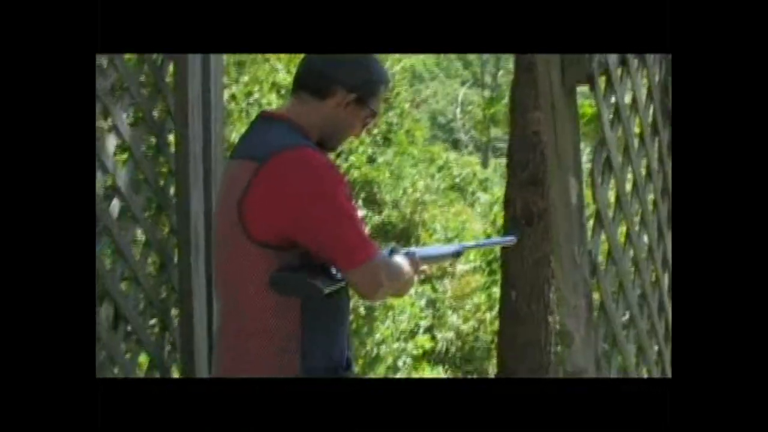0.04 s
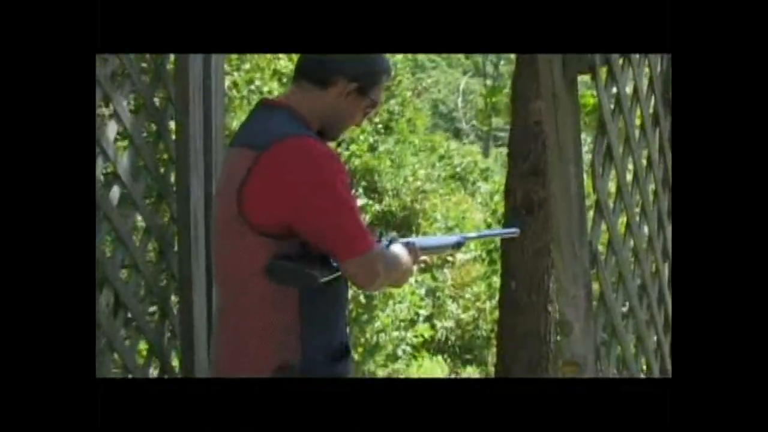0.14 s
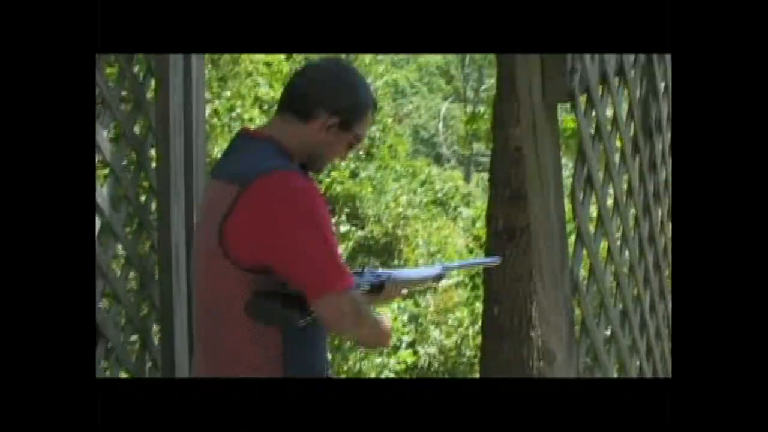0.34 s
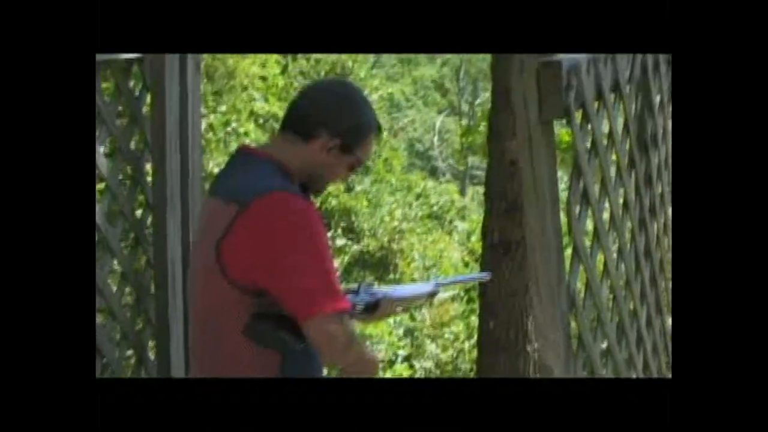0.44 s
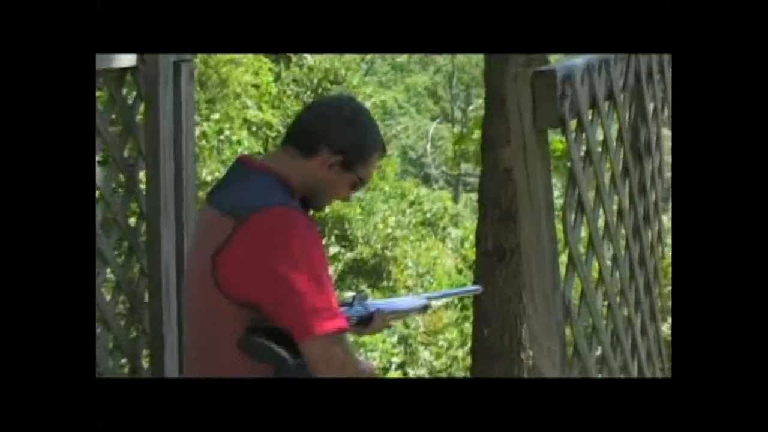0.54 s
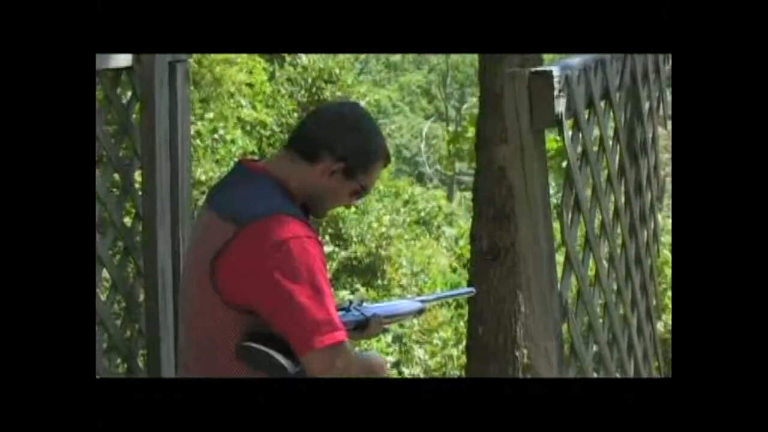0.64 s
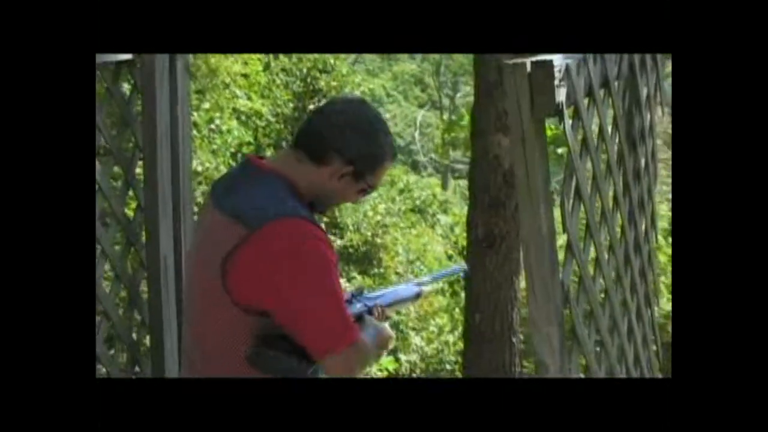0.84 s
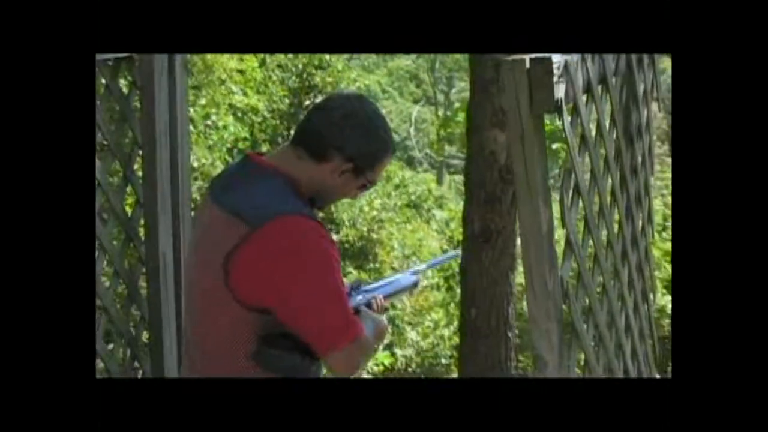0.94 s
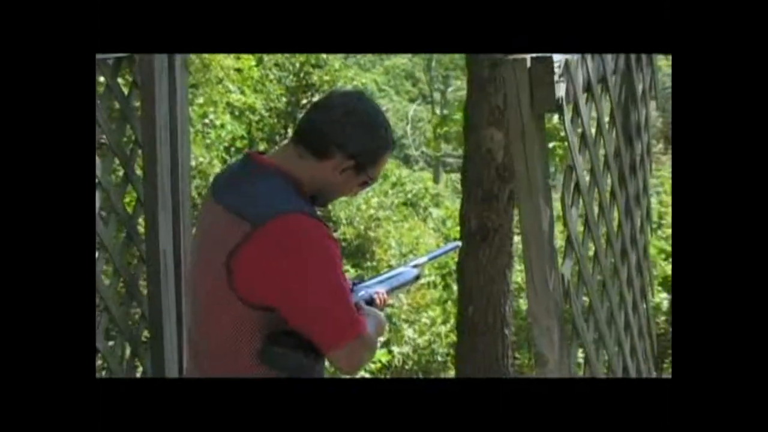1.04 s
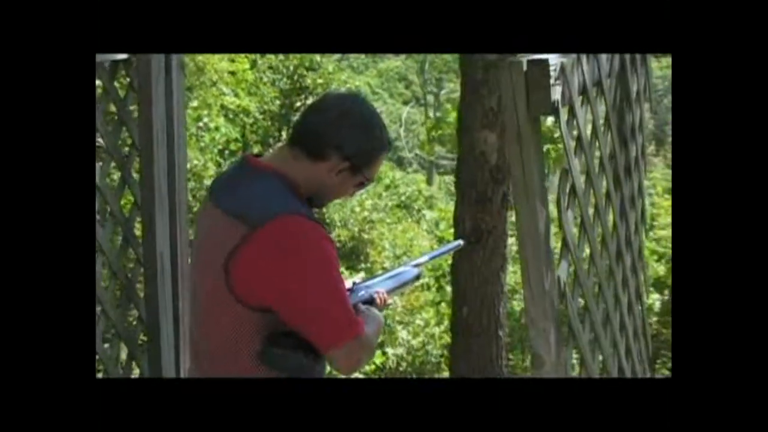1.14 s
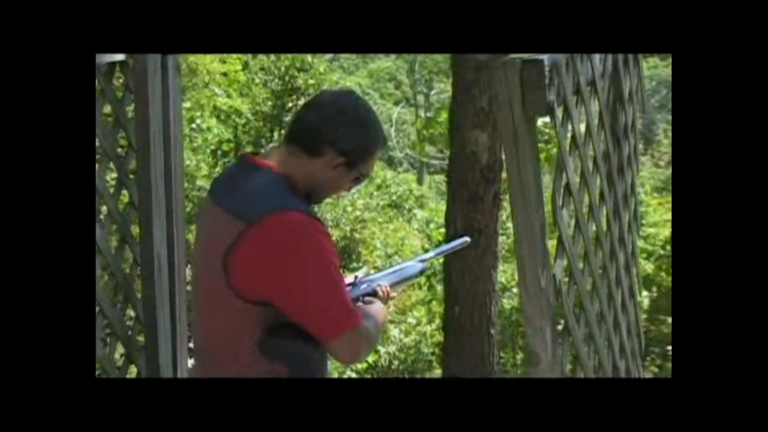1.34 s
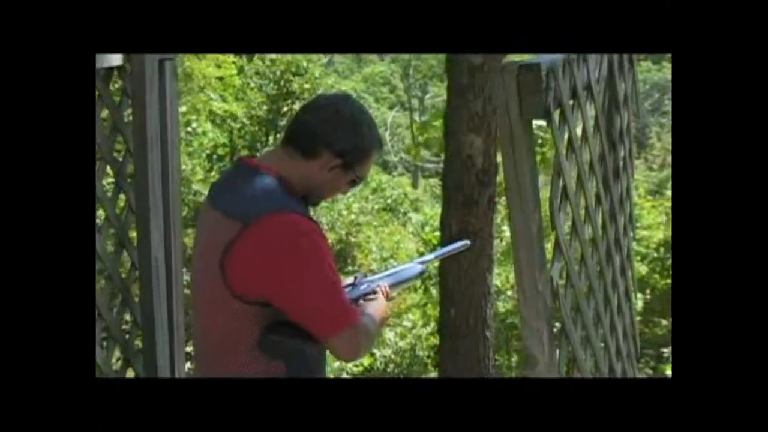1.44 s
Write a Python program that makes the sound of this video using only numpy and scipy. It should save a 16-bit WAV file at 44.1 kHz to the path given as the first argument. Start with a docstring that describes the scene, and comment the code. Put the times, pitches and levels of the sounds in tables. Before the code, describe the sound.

A shotgun bolt scrapes forward and slams shut with a loud clack and brief steel ring. Hands softly bump the gun, then a shell clicks against the loading gate. Light wind lies underneath at an outdoor wooden shooting stand.

```python
"""Soft bumps of hands and a faint click, then a shotgun's bolt scrapes forward and slams shut: a fast run
of metal contacts that overloads the microphone and leaves the steel ringing. Hands bump the gun again
and a shell clicks against the loading gate. The open wooden shooting stand throws back quick reflections,
fence and trees add a faint tail, and light wind and distant outdoor noise lie underneath."""
import sys
import numpy as np
from scipy import signal
from scipy.fft import rfft, irfft
from scipy.io import wavfile
from scipy.ndimage import uniform_filter1d

SR = 44100
rng = np.random.default_rng(int(sys.argv[2]) if len(sys.argv) > 2 else 0)


def store_pcm(level_fs):
    """Save levels as 16-bit WAV."""
    pcm = np.round(np.clip(level_fs, -1, 1) * 32767).astype(np.int16)
    wavfile.write(sys.argv[1], SR, np.atleast_2d(pcm).T)


N = 63945

# Hits of the closing bolt: start_s, body_db, clank_db, treble_db, hold_s, ring_hz, boost_db
BOLT_HITS = [(0.2403, -31, -19.5, -29, .0015, 2965, 15), (0.2436, -18, -24, -22, .0017, 6760, 7.5),
             (0.2499, -18.5, -17.5, -26, 0.001, 1988, 1), (0.2526, -14.5, -10, -14, 0.0012, 476, 9.5),
             (0.2577, -24.5, -16, -18.5, 0.0076, 1240, 14), (0.2648, -18.5, -20, -18.5, 0.0015, 6100, 12),
             (0.2685, -16, -21.5, -20, .003, 799, 0), (0.2728, -20, -14, -19, 0.0019, 7040, 9.5),
             (0.2785, -25, -15.5, -20.5, 0.002, 2388, 4.5), (0.2814, -8.5, -9.5, -11, 0.0049, 700, 5),
             (0.2865, -18, -19.5, -28.5, 0.0037, 2320, -10), (0.2950, -21, -22, -24.5, 0.0079, 2000, 1.5),
             (0.3025, -10, -13, -13.5, .0035, 535, 8.5), (0.3072, -25.5, -21, -20.5, .003, 1460, 4.5),
             (0.3123, -17, -8.5, -10, .005, 15100, 9.5), (0.3176, -3, -3.5, -4.5, 0.0046, 2150, 3),
             (0.3229, -7.5, -9, -11, .0048, 1400, 0.5)]
# Short resonances of the bolt and its rails: pitch_hz, width_hz, level_db
BOLT_MODES = [(461.5, 160, -6.5), (700, 90, 1), (781, 23, 1.5), (950, 160, 2.5), (1415, 210, -5),
              (1487, 45, -2.5), (1663, 70, -1), (1990, 200, -1.5), (2250, 180, 0.5), (2565, 50, -3),
              (2850, 250, -3), (3185, 230, -5.5), (4513, 200, -12.5), (5530, 300, -11), (5940, 830, -12),
              (7280, 470, -8), (8330, 460, -7.5), (8800, 1500, -12.5), (12420, 1400, -8.5),
              (13940, 350, -17.5)]
# Broad tone of the bolt hits: frequency_hz, gain_db
BOLT_EQ = [(40, 2.5), (150, 1), (330, 0), (500, -2), (850, -4), (1150, -0.5), (2200, -4.5), (3000, -3.5),
           (4000, 0.5), (6000, -2), (8300, -2), (10500, 0.5), (12500, -5.5), (15300, -1.5)]
# Long ring of barrel and spring: pitch_hz, relative_db, t60_s
STEEL_MODES = [(495, -33, .27), (1335, -32, .17), (1663, -32, .56), (2557, -49, .24), (4463, -48, .35),
               (5060, -58, .5), (6315, -54, .27), (6745, -50, .2), (9087, -52, .23), (9412, -46, .18),
               (11538, -52, .22)]
# Clicks of shell, gate and fingers: start_s, body_db, clank_db, treble_db, hold_s, ring_hz, boost_db
SHELL_CLICKS = [(0.0390, -41.5, -51, -66, 0.0018, 1140, 24), (0.9720, -65, -75, -58, 0.0022, 12500, 20.5),
                (1.0592, -28.5, -49, -54, 0.00045, 500, 17.5), (1.0718, -44, -72, -44, 0.0014, 988, 19.5),
                (1.0782, -30.5, -39.5, -83, 0.0023, 1100, 3), (1.1250, -47, -47.5, -61, 0.0017, 1060, 17),
                (1.2184, -22.5, -21.5, -21.5, 0.0021, 1474, 3.5), (1.2218, -29, -50, -29, 0.0019, 6530, 2),
                (1.2480, -37, -48, -60, 0.00049, 3060, -1), (1.2612, -38.5, -38.5, -47, 0.0024, 3150, 3.5),
                (1.2662, -30.5, -44, -37.5, 0.00175, 7630, 12.5), (1.2688, -32, -37, -38, 0.0023, 1570, 7),
                (1.2912, -40, -50.5, -48, 0.00066, 3300, 14), (1.3788, -36, -31, -37, 0.00029, 3170, -4),
                (1.4010, -52, -33, -45, 0.0004, 2500, 3.5), (1.4470, -66, -33.5, -43, 0.00036, 4250, 6.5)]
# Short resonances of the receiver: pitch_hz, width_hz, level_db
RECEIVER_MODES = [(745, 90, -3), (855, 85, 8), (1340, 170, 2), (1570, 170, 0), (1900, 220, -2),
                  (2450, 260, -1), (3100, 240, 2), (4580, 300, -7), (4930, 250, -7), (5860, 350, -7),
                  (6730, 230, -4), (8200, 400, -10), (9800, 800, -7), (11650, 400, -8)]
# Broad tone of the clicks: frequency_hz, gain_db
CLICK_EQ = [(60, -20), (250, 0), (420, -8.5), (650, 0), (1100, -8.5), (1500, -4), (3000, -2), (3700, -2),
            (4500, -2), (6000, -6), (11000, -9.5), (15500, -2)]
# Soft bumps of hands and stock: start_s, level_db, pitch_hz, length_s, relative_rub_db
HAND_BUMPS = [(0.037, -35, 74, 0.014, -14), (0.131, -38.5, 58, 0.015, -18), (0.146, -36, 93, 0.014, -29),
              (0.241, -29, 59, 0.0079, -17), (0.310, -24.5, 74.7, 0.013, -7),
              (0.616, -39.5, 117, 0.017, -18), (0.658, -38, 114.7, .016, -14.5),
              (0.707, -32, 158.3, 0.02, -6), (0.732, -36, 149.7, 0.02, -7.5), (0.923, -35, 183, 0.015, -9),
              (1.058, -38, 385, 0.0056, -13), (1.266, -39, 279, 0.012, -10)]
# Reverb tail from fence and trees: frequency_hz, t60_s, level_db
YARD_SCATTER = [(200, 0.35, -26.5), (600, 0.13, -19), (1566, 0.18, -31), (3940, .4, -25), (9500, 0.22, -21),
                (15380, 0.34, -23)]
# Tone of the outdoor bed: frequency_hz, gain_db
AIR_EQ = [(20, -29), (45, -5.5), (80, 0), (130, -3.5), (200, -8.5), (400, -13.5), (800, -13.5),
          (1300, -18.5), (2000, -25.5), (4000, -31), (8000, -38), (12000, -40), (15500, -49.5)]
# Fader moves of the wind rumble: time_s, level_db
RUMBLE_FADER = [(0, -45), (.15, -50.5), (.21, -48), (.4, -47.5), (0.661, -45.5), (0.801, -47.5),
                (.86, -46.5), (.9, -57.5), (.96, -49.5), (1.1, -55), (1.19, -52.5), (1.3, -56), (1.45, -55)]

BODY_HZ, CLANK_LOW_HZ, CLANK_HIGH_HZ, TREBLE_HZ = 1083, 2270, 4200, 7000  # a contact's three bands
RING_Q, BEND_DELAY_S = 6.4, 0.00069
CRACK_DB, CRACK_S, GRAIN_DB = -4, 0.00069, 5.5
LOCK_S, STEEL_TRIM_DB = 0.35, -5.5
RUB_BAND_HZ = (111, 444)
STAND_DB, STAND_T60_S = -14.5, 0.04
WASH_DB, RUMBLE_BELOW_HZ = -52, 250
DRIVE_DB, CEILING, LOWPASS_HZ = 0.5, 0.92, 15500


def bolt():
    """The bolt clatters along its rails and slams shut."""
    return metal_contacts(BOLT_HITS, BOLT_MODES, BOLT_EQ, release_s=0.0015)


def steel_ring():
    """Barrel and spring ring on after the bolt locks."""
    t, out = np.arange(N) / SR, np.zeros(N)
    for hz, db, t60 in STEEL_MODES:
        decay = np.exp(-np.log(1000) * t / t60)
        add(out, LOCK_S, amp(STEEL_TRIM_DB + db) * decay * np.sin(2 * np.pi * hz * t))
    return out


def shell_clicks():
    """Shell, gate and fingers tap the receiver: small, tight clicks."""
    return metal_contacts(SHELL_CLICKS, RECEIVER_MODES, CLICK_EQ, release_s=0.00052)


def metal_contacts(hits, modes, eq, release_s, size=4096):
    """Each contact rings the metal and favours one pitch region, set by where it lands."""
    hz, out = np.fft.rfftfreq(size, 1 / SR), np.zeros(N)
    mode_power = sum(amp(db) ** 2 / (1 + (2 * (hz - f) / width) ** 2) for f, width, db in modes)
    metal = unit(np.sqrt(mode_power) * amp(curve(eq, hz)))
    bend_delay = BEND_DELAY_S / np.sqrt(1 + (hz / BODY_HZ) ** 2)  # low bending waves arrive late
    bend_phase = 2 * np.pi * np.cumsum(bend_delay) * SR / size
    for start_s, body_db, clank_db, treble_db, hold_s, ring_hz, boost_db in hits:
        bands = [(BODY_HZ, body_db), (CLANK_LOW_HZ, clank_db),
                 (CLANK_HIGH_HZ, clank_db), (TREBLE_HZ, treble_db)]
        ring = 1 + (amp(boost_db) - 1) / (1 + (2 * RING_Q * (hz / ring_hz - 1)) ** 2)
        log_gain = np.log(metal * ring * amp(curve(bands, hz)))
        # Minimum phase keeps the attack sharp, with the ring behind it.
        phase = signal.hilbert(np.r_[log_gain, np.flip(log_gain[1:-1])]).imag[:len(hz)]
        response = np.exp(log_gain - 1j * (phase + bend_phase))
        add(out, start_s, irfft(chatter(hold_s, release_s, size) * response))
    return out


def chatter(hold_s, release_s, size):
    """Near-flat spectrum of a burst of uneven micro-impacts: a crack, a hold, then a die-away."""
    t = np.arange(size) / SR
    crack = 1 + amp(CRACK_DB) * np.exp(-t / CRACK_S)
    envelope = crack * np.exp(-np.maximum(t - hold_s, 0) / release_s)
    grains = np.repeat(rng.standard_normal(size // 16), 16)
    force = envelope * rng.standard_normal(size) * amp(GRAIN_DB * np.clip(grains, -2, 2))
    for _ in range(4):  # flatten the tone, then restore the envelope
        spectrum = rfft(force)
        flat = irfft(spectrum / (abs(spectrum) + 1e-12))
        force = envelope * flat / np.sqrt(abs(uniform_filter1d(flat ** 2, size=88)) + 1e-12)
    return rfft(force * np.linalg.norm(envelope) / np.linalg.norm(force))


def hand_bumps():
    """Hands knock the stock: dull thumps of a few cycles, each with a little rubbing."""
    t, out = np.arange(SR // 4) / SR, np.zeros(N)
    rub_filter = signal.butter(2, RUB_BAND_HZ, "band", fs=SR, output="sos")
    for start_s, db, hz, length_s, rub_db in HAND_BUMPS:
        progress = 2 * t / length_s
        swell = (progress * np.exp(1 - progress)) ** 2
        rub = unit(signal.sosfilt(rub_filter, rng.standard_normal(len(t))))
        add(out, start_s, amp(db) * swell * (np.sin(2 * np.pi * hz * t) + amp(rub_db) * rub))
    return out


def reflections(gun):
    """A quick slap from the wooden stand and a faint, longer scatter from fence and trees."""
    t = np.arange(SR) / SR
    fade_in = 1 - np.exp(-(t / 0.0021) ** 2)
    stand = fade_in * rng.standard_normal(SR) * np.exp(-np.log(1000) * t / STAND_T60_S)
    stand *= amp(STAND_DB) / np.linalg.norm(stand)
    hz, frame_s, noise = signal.stft(rng.standard_normal(SR), SR, nperseg=256)
    decay_rate = np.log(1000) / curve([(f, t60) for f, t60, _ in YARD_SCATTER], hz)[:, None]
    level = amp(curve([(f, db) for f, _, db in YARD_SCATTER], hz))[:, None]
    envelope = level * np.sqrt(2 * decay_rate / SR) * np.exp(-decay_rate * frame_s)
    tail = signal.istft(noise * envelope, SR, nperseg=256)[1][:SR]
    return signal.fftconvolve(gun, stand + fade_in * tail)[:N]


def outdoor_air():
    """Light wind rumbles and eases off unevenly under a steady distant wash."""
    hz = np.fft.rfftfreq(N, 1 / SR)
    noise = rfft(rng.standard_normal(N)) * amp(curve(AIR_EQ, hz))
    lows = 1 / (1 + (hz / RUMBLE_BELOW_HZ) ** 2)
    rumble_db = np.interp(np.arange(N) / SR, *np.transpose(RUMBLE_FADER))
    rumble = amp(rumble_db) * unit(irfft(noise * lows, N))
    wash = amp(WASH_DB) * unit(irfft(noise * (1 - lows), N))
    return rumble + wash


def amp(db):
    """Decibels to gain."""
    return 10 ** (np.asarray(db) / 20)


def unit(x):
    """Scales to rms 1."""
    return x / np.sqrt(np.mean(abs(x) ** 2) + 1e-20)


def curve(points, hz):
    """Joins (frequency_hz, value) points on a log-frequency axis."""
    f, value = np.transpose(points)
    return np.interp(np.log(hz + 1), np.log(f + 1), value)


def add(mix, start_s, sound):
    """Drops a sound into the mix at start_s."""
    part = mix[round(start_s * SR):][:len(sound)]
    part += sound[:len(part)]


def scene():
    """Mono mix of the gun, its reflections and the outdoor bed."""
    gun = bolt() + shell_clicks() + steel_ring() + hand_bumps()
    return (gun + reflections(gun) + outdoor_air())[None]


def record(dry):
    """The slam drives the microphone into soft clipping; a steep low-pass trims the very top."""
    driven = dry * amp(DRIVE_DB) / CEILING
    clipped = CEILING * driven / (1 + driven ** 6) ** (1 / 6)
    lowpass = signal.firwin(401, LOWPASS_HZ, window=("kaiser", 8), fs=SR)
    return signal.oaconvolve(clipped, lowpass[None], "same")


dry = scene()
out = record(dry)
store_pcm(out)
```